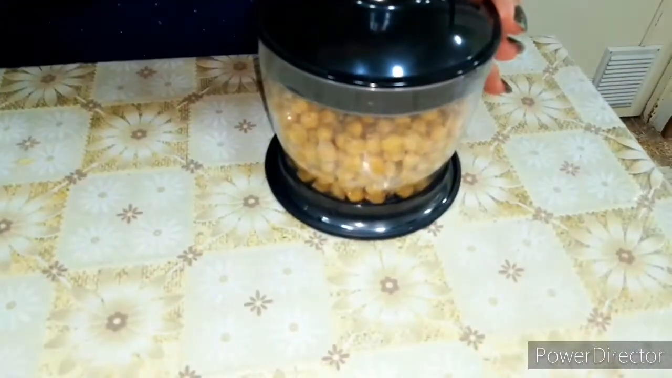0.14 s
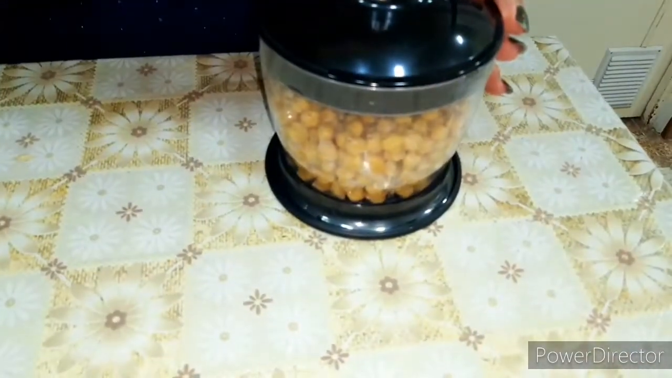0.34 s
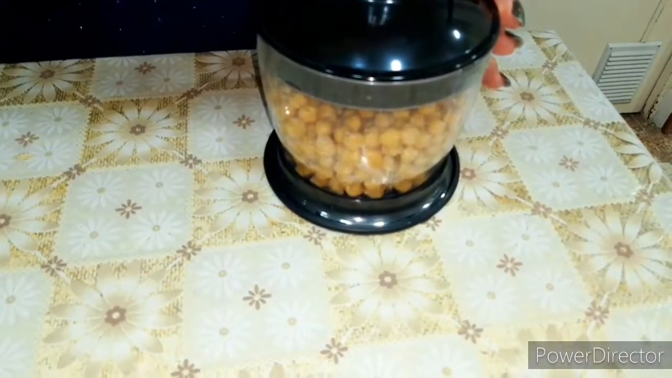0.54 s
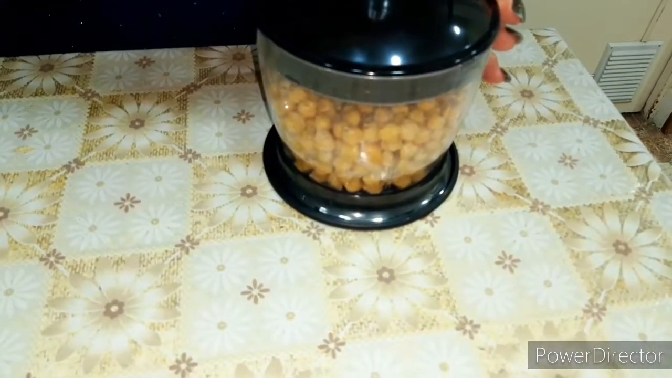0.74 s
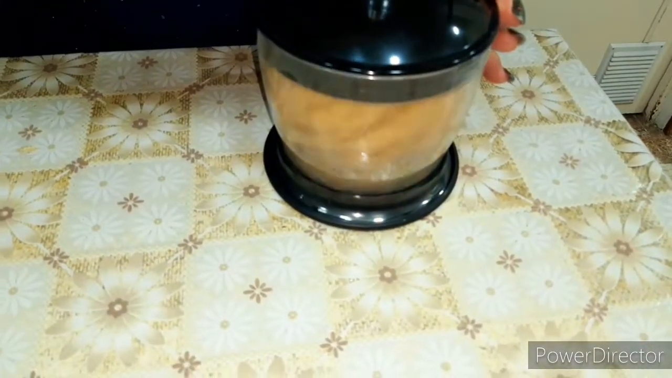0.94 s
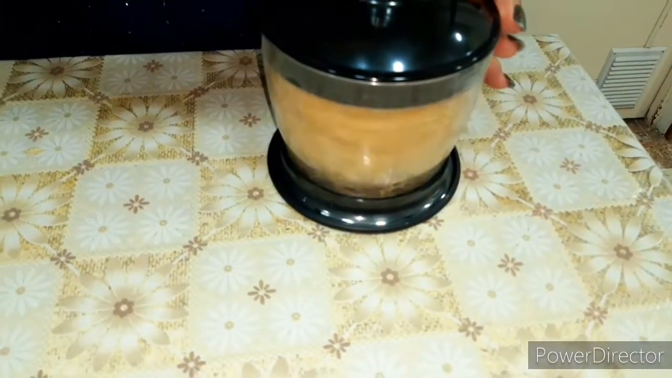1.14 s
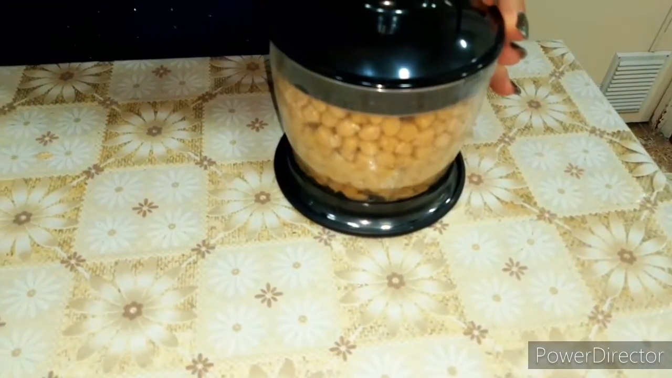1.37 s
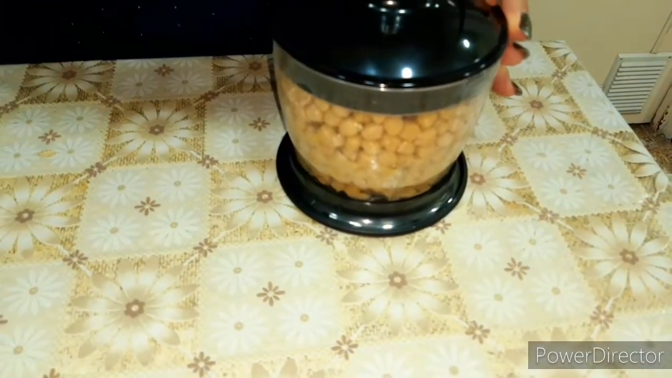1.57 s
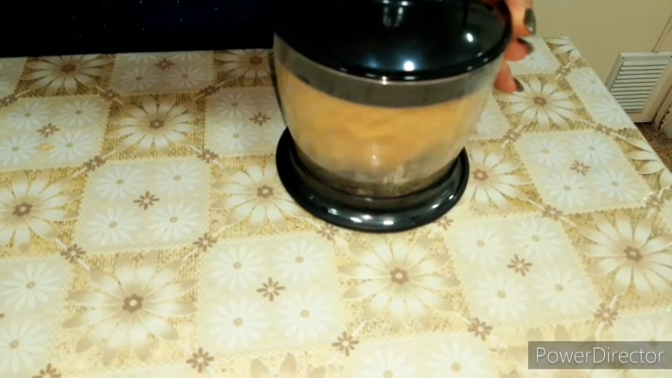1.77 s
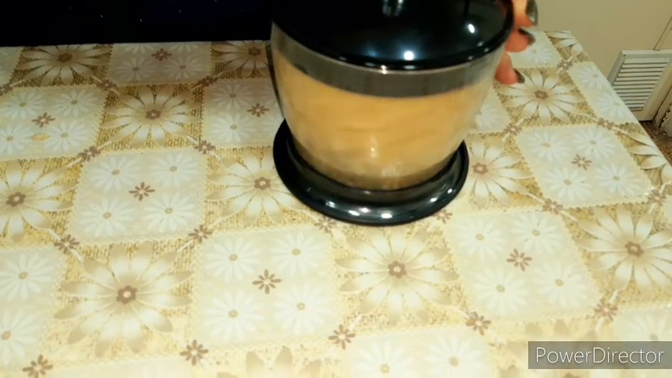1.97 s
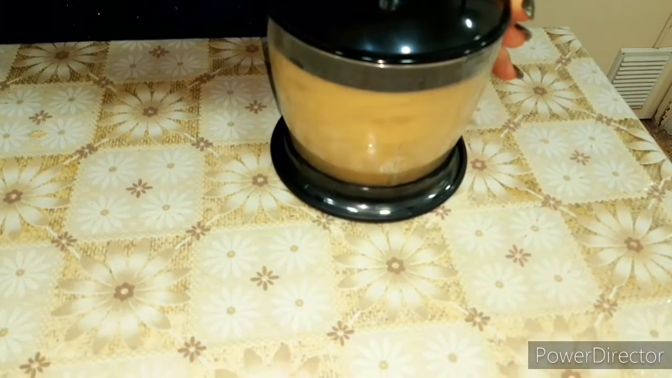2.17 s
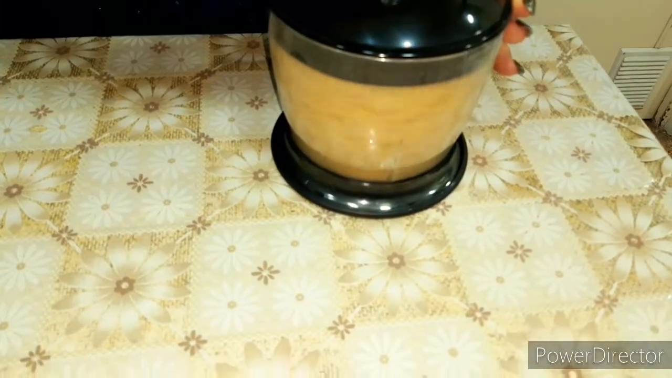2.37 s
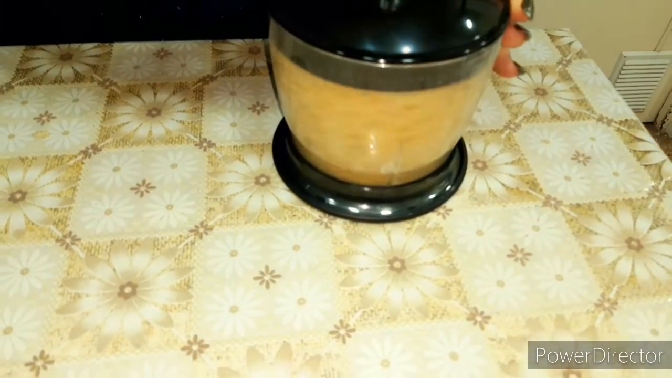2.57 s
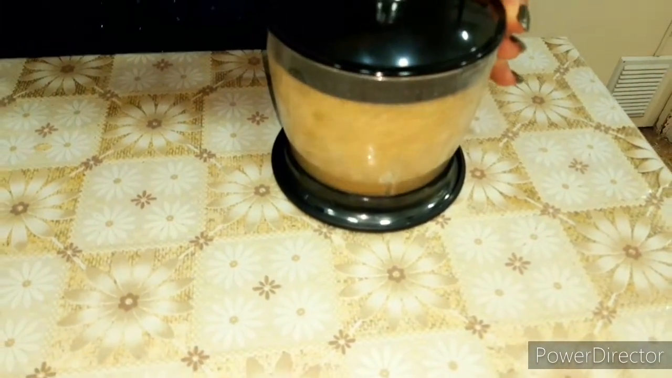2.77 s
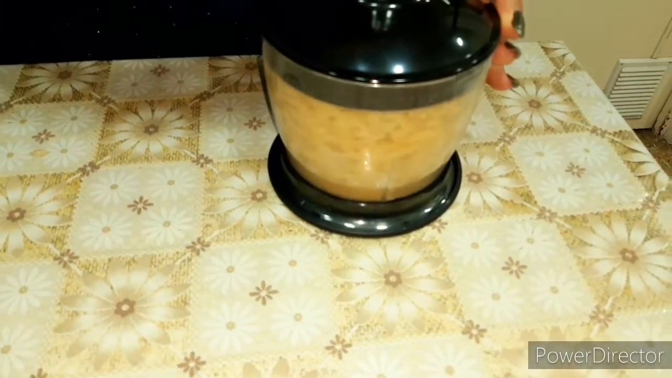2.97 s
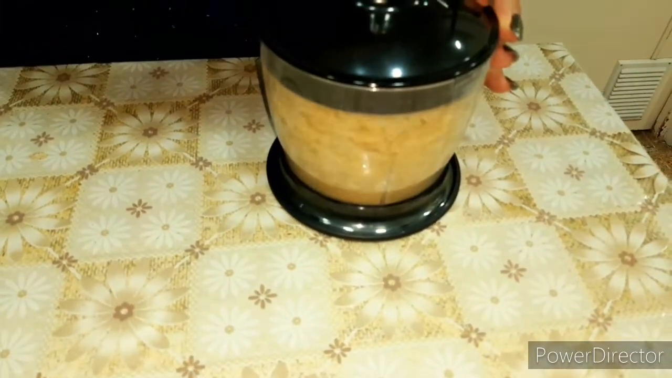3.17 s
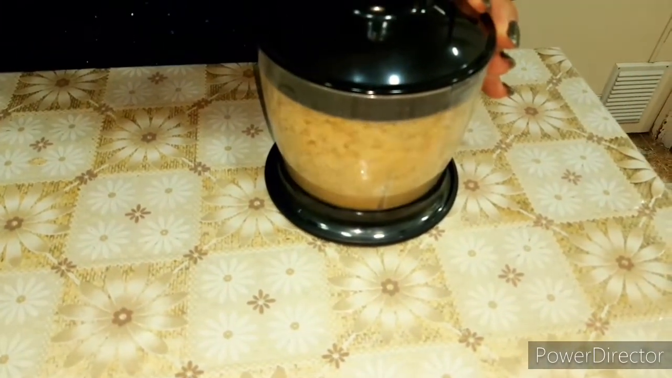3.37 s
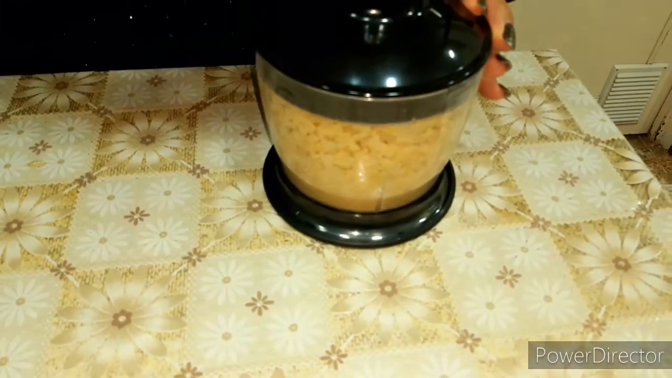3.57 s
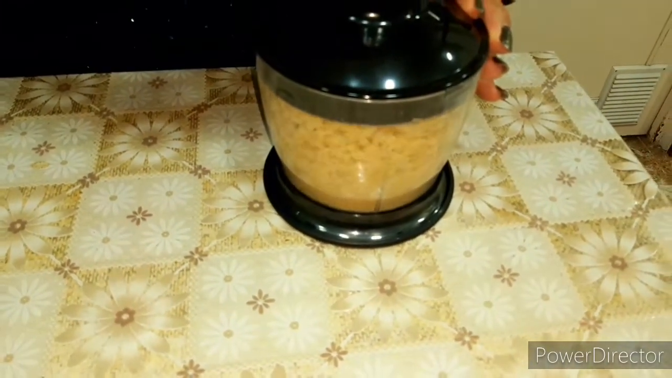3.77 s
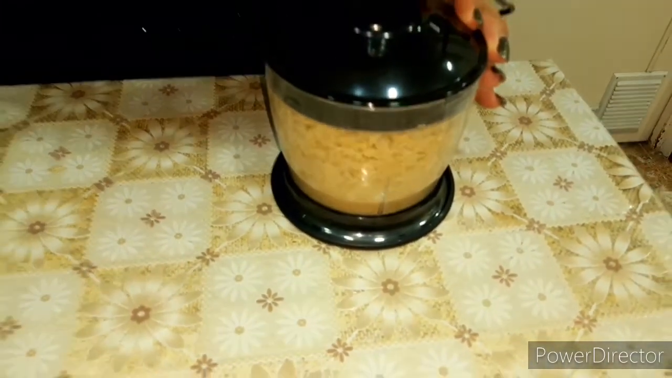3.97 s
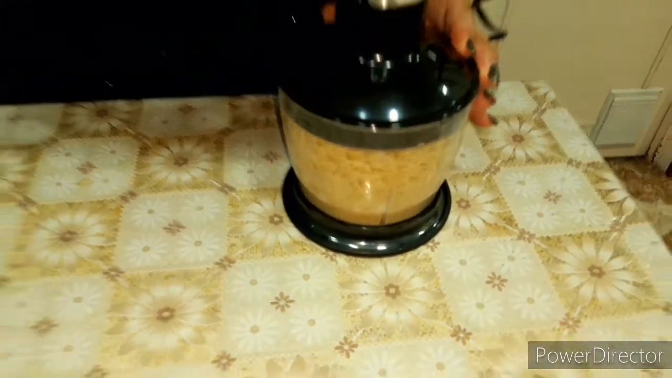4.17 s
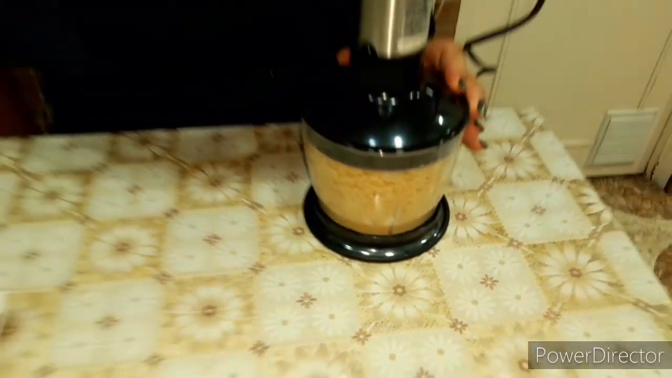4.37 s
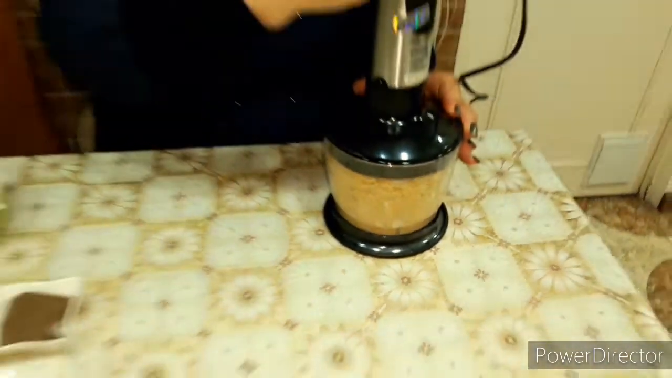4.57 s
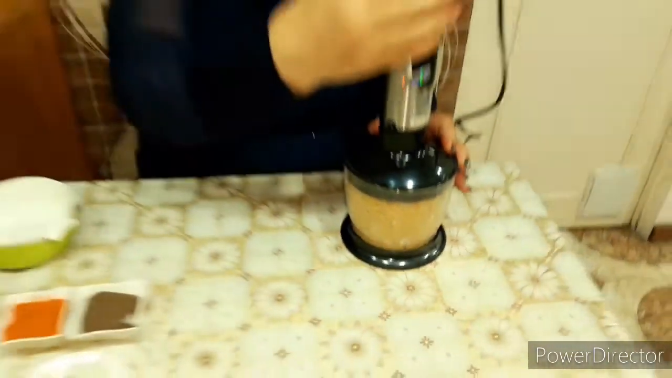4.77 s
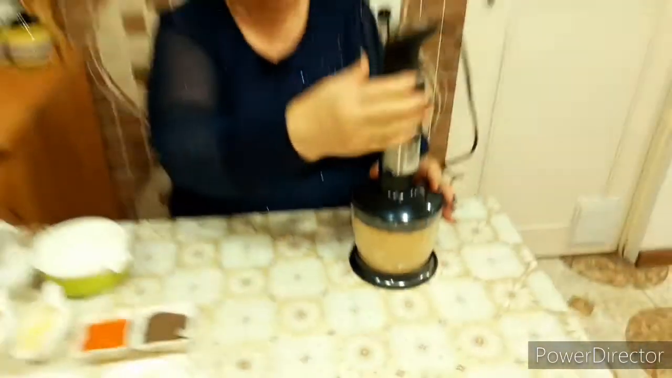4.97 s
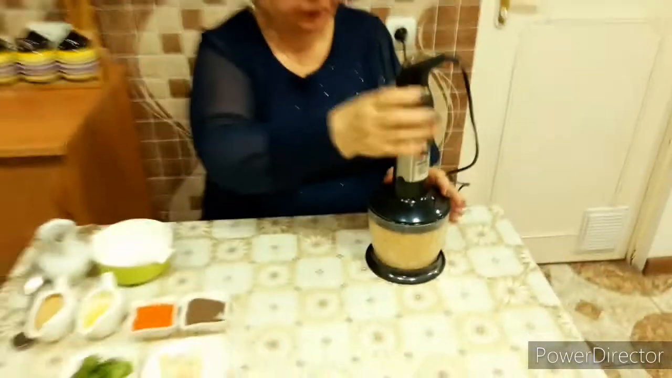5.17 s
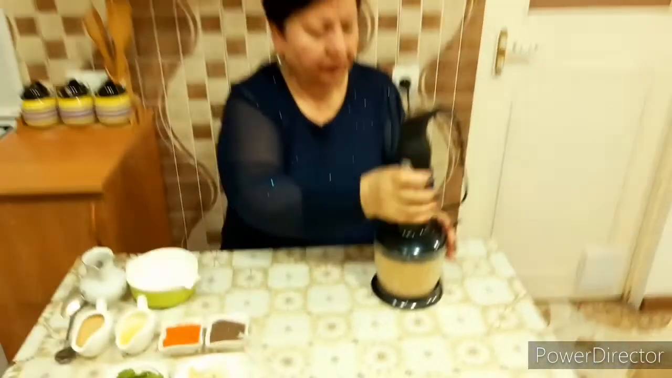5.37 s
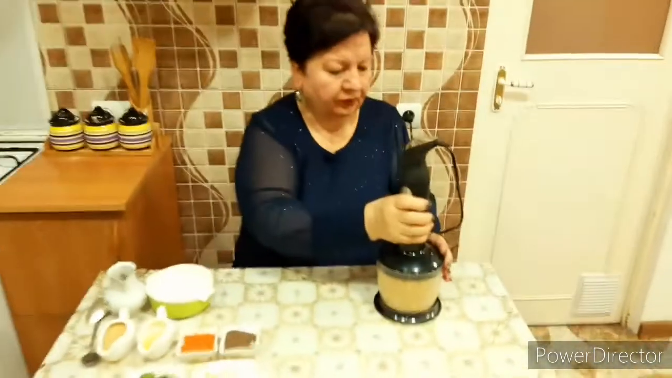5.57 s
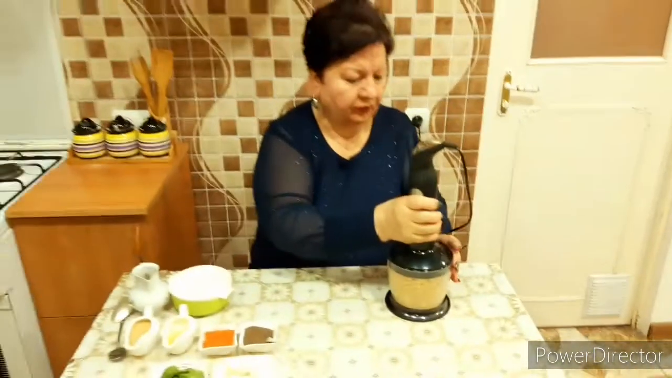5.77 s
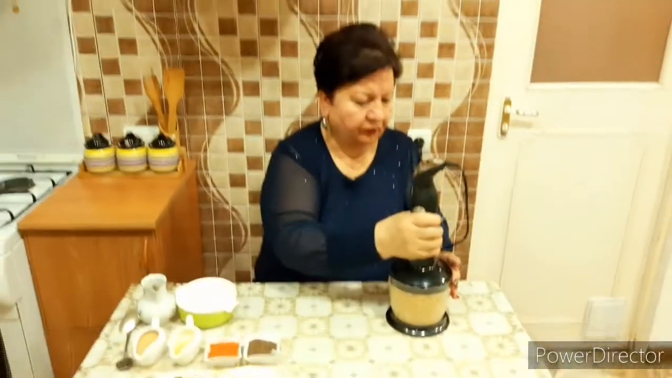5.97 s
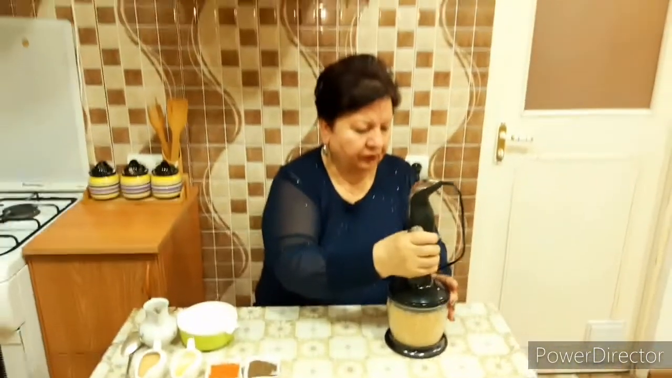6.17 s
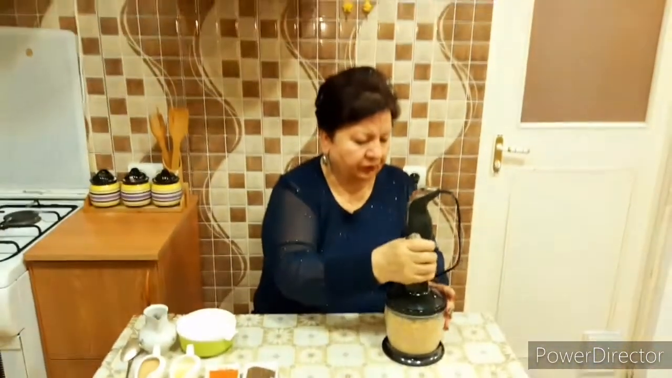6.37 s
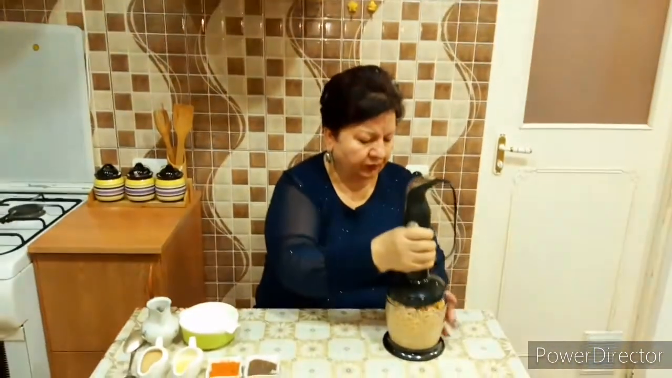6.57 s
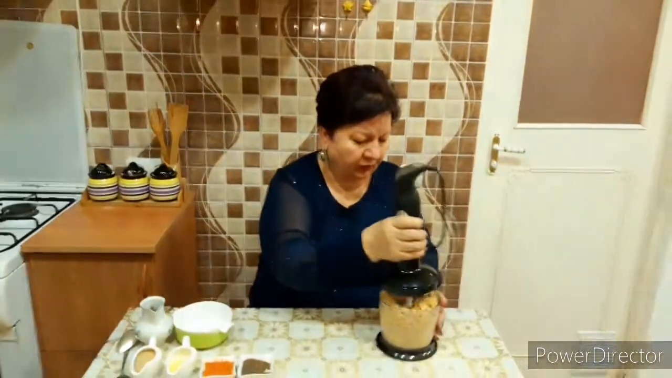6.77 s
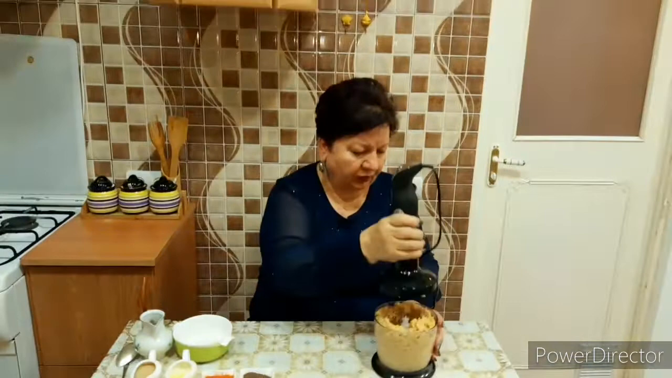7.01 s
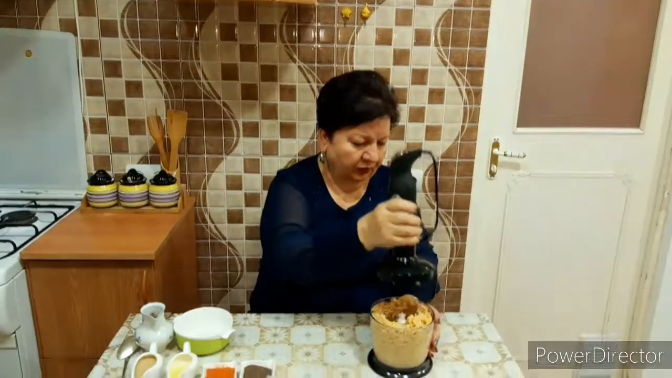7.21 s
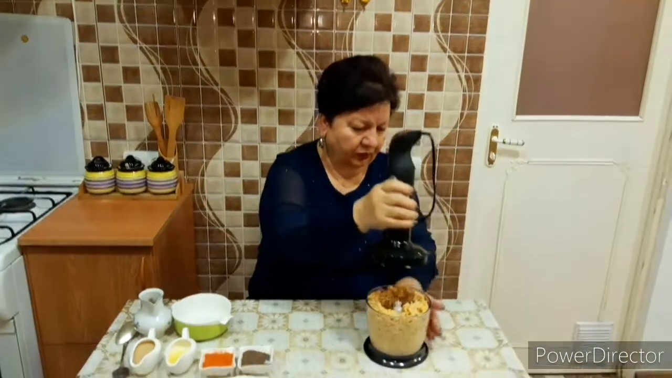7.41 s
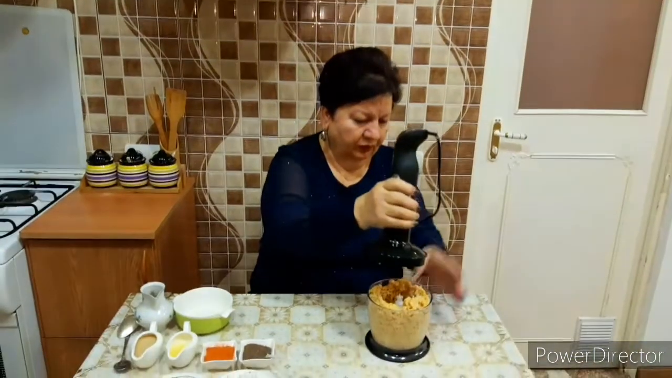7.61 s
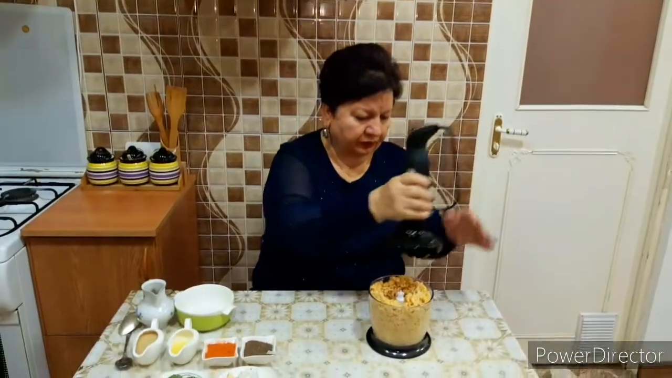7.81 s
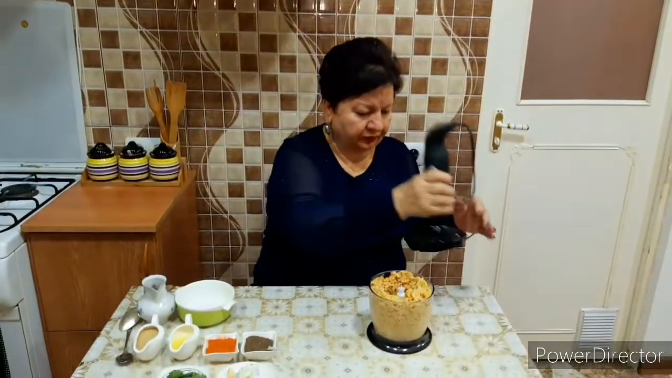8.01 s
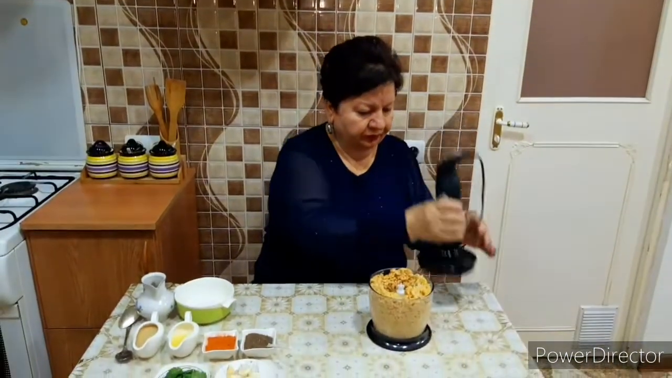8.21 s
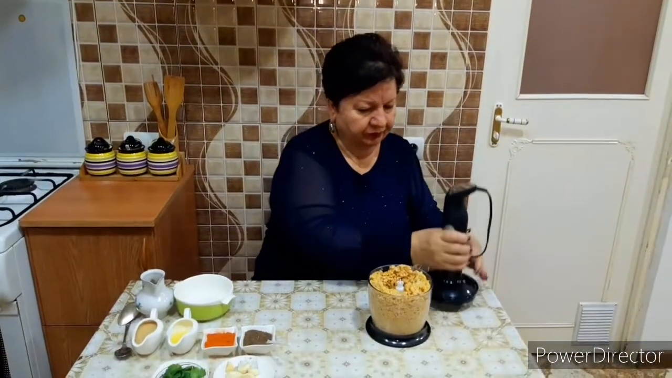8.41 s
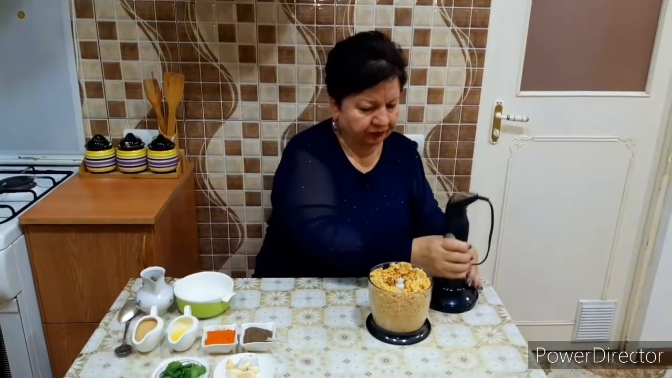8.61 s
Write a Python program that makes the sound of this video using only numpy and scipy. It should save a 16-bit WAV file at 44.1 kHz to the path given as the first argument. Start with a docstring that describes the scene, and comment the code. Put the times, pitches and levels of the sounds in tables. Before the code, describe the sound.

Close to the microphone in an echoing tiled kitchen, an electric chopper jerks on for a brief clattering pulse through whole chickpeas and coasts down. It then runs for over two seconds, whining and rattling while hard knocks soften into a dense paste churn. After it winds down, the lid, heard from further back, clicks, groans, pops and slides off over quiet room hum.

```python
"""A tiled kitchen: a hand blender drives a chopper bowl of boiled chickpeas, one short pulse, then a longer run.
Shaped noise and tiny impacts make the blade's battering; single ticks are whole peas on the wall.
Pulsing noise makes the gears rattle, sine tones make the motor whine; both slow as the paste thickens.
Clicks, rubbing and slides work the lid loose and lift it off, over room noise and an appliance's hum."""
import sys
import numpy as np
from scipy import signal
from scipy.fft import rfft, irfft, next_fast_len
from scipy.io import wavfile

SR = 44100
rng = np.random.default_rng(int(sys.argv[2]) if len(sys.argv) > 2 else 0)


def to_wav(sig):
    """Store sig (one row per channel, or 1-D mono) as 16-bit WAV at the path in sys.argv[1].

    Samples outside -1..1 are clipped; the rate is SR.
    """
    pcm = np.clip(np.atleast_2d(sig), -1, 1) * 32767
    pcm = np.round(pcm).astype(np.int16)
    wavfile.write(sys.argv[1], SR, pcm.T)  # frames by channels


N = 381465
TIME = np.arange(N) / SR

# the button is held: (on [s], off [s], coasting time constant [s], relative whine level [dB])
RUNS = [(0.902, 1.112, .172, -0.5), (1.721, 4.333, .268, 1.5)]
# colour of the plastic lid, also lent to the coupling: (pitch [Hz], relative level [dB per Hz])
LID_COLOUR = [(200, 2), (400, 4), (600, 4), (1000, 5.5), (1500, 2), (2100, 3.5), (2800, -9.5),
              (5000, -16.5), (7500, -33.5), (9000, -43.5), (14000, -50.5)]
# loudness of the battered peas, as explained in loudness():
# (level in whole peas [dB], change once paste [dB], power of the speed, share of a bite)
CHOP_LOUDNESS = (-18, -5.5, 1.5, 1.0)
PASTE_FROM_S, PASTE_DONE_S = 1.8, 4.25   # the peas turn to paste


def from_db(db):
    """Turn decibels into a gain."""
    return 10 ** (np.asarray(db) / 20)


def rms_one(x):
    """Scale a sound to an average strength (rms) of 1."""
    return x / np.sqrt(np.mean(x ** 2) + 1e-20)


def in_time(rows):
    """Draw a curve through (time, value) points, one value for every sample."""
    return np.interp(TIME, *np.transpose(rows))


def at_hz(points, hz):
    """Read a (pitch, value) curve, with pitch on a logarithmic scale as the ear hears it."""
    points = np.array(points)
    return np.interp(np.log(hz), np.log(points[:, 0]), points[:, 1])


def drift(rate):
    """Wander at random around 0 with a spread of about 1, towards `rate` new targets a second."""
    targets = rng.standard_normal(N // 20)
    return np.interp(TIME * rate, np.arange(len(targets)), targets) * np.sqrt(1.5)


def colour(x, points):
    """Filter with a given spectrum that never sounds ahead of its input; white noise keeps its power."""
    size = 8192
    hz = np.maximum(np.arange(size // 2 + 1) * SR / size, 1)
    gain = rms_one(from_db(at_hz(points, hz)))
    # folding the cepstrum forward packs the response as early as possible (minimum phase)
    cepstrum = irfft(np.log(gain))
    cepstrum[1:size // 2] *= 2
    cepstrum[size // 2 + 1:] = 0
    response = irfft(np.exp(rfft(cepstrum)))[:size // 2]
    response = response.reshape((1,) * (x.ndim - 1) + (-1,))
    return signal.oaconvolve(x, response, axes=-1)[..., :N]


def resonance(x, hz, width):
    """Ring at one pitch: a two-pole band-pass with gain 1 on top; a narrow width [Hz] rings longer."""
    r = np.exp(-np.pi * width / SR)
    poles = [1, -2 * r * np.cos(2 * np.pi * hz / SR), r * r]
    return signal.lfilter([1, 0, -1], poles, x + 1e-18) * (1 - r * r) / 2


def rings(x, modes):
    """Add up resonances (pitch, width, level); at 0 dB each keeps the power of white noise."""
    return sum(from_db(db) * np.sqrt(SR / np.pi / width) * resonance(x, hz, width)
               for hz, width, db in modes)


def grains(per_s, spread_db):
    """Scatter tiny impacts of uneven size at random moments; rms 1."""
    sizes = from_db(spread_db * np.minimum(rng.exponential(1, N), 4))
    sizes = sizes * rng.choice([-1, 1], N)
    return rms_one(sizes * (rng.random(N) < per_s / SR))


def blows(rows):
    """Place one single-sample impulse for each (time, level) row."""
    out = np.zeros(N)
    for s, db in rows:
        out[round(s * SR)] += from_db(db)
    return out


def swell(s, length):
    """A smooth bump of height 1 around a moment; length is its width at half height."""
    return np.exp2(-np.minimum((2 * (TIME - s) / length) ** 2, 60))


def strokes(rows):
    """Gain of hand movements (middle, length, level) that each swell and fade."""
    return sum(from_db(db) * swell(s, length) for s, length, db in rows)


def dying(s, decay_s):
    """A sudden rise to 1, then an exponential fall."""
    return np.exp(-np.minimum(np.abs(TIME - s) / decay_s, 30)) * (TIME >= s)


def read(x, seconds):
    """Play a sound along another clock, so that its pitch follows the clock's pace."""
    return np.interp(seconds, TIME, x)


def each_turn(turns, count=900):
    """A fixed random roughness that the blade and gears meet again on every turn; rms 1."""
    return rms_one(np.interp(turns % 1 * count, np.arange(count), rng.standard_normal(count)))


def background(width=.3, hiss_db=-81):
    """Dull room noise, a hum of steady mains tones that waver a little, and faint hiss."""
    # level of room noise and hum together: (time [s], level [dB])
    ambience = [(.15, -57), (1.6, -63), (4.9, -63.5), (5.5, -61), (6.1, -55.5), (8.65, -54)]
    # colour of the room noise: (pitch [Hz], relative level [dB per Hz])
    room_colour = [(25, -44.5), (50, -16), (70, -15), (92, -7.5), (130, -4.5), (180, -8), (250, -10),
                   (305, -5.5), (350, -7.5), (420, -6.5), (580, -17.5), (800, -16.5), (1000, -26.5),
                   (1400, -30.5), (2500, -44.5), (4500, -64.5), (15000, -51)]
    # tones of the hum: (pitch [Hz], relative level [dB])
    hum_tones = [(100, -4.5), (200, -16), (300, -4), (400, -12.5)]
    # the hum fades briefly: (middle [s], length [s], loss [dB])
    hum_dip = (1.55, .5, 10)
    hum_db = 0.5   # against the room noise

    mid, side = colour(rng.standard_normal((2, N)), room_colour)
    rumble_cut = signal.butter(2, 55, "high", fs=SR, output="sos")
    air = signal.sosfilt(rumble_cut, mid + width * side * [[1], [-1]])
    hum = np.zeros(N)
    for hz, db in hum_tones:
        strength = np.sqrt(2) * from_db(db + 1.1 * drift(6.6))
        hum += strength * np.sin(2 * np.pi * hz * TIME + 0.292 * drift(9.8))
    s, length, lost_db = hum_dip
    hum = from_db(hum_db - lost_db * swell(s, length)) * hum
    hiss = from_db(hiss_db) * rng.standard_normal((2, N))
    return from_db(in_time(ambience)) * (air + hum) + hiss


def lid(click_db=-1.0, pop_db=-52, rub_db=-6.0, slide_db=-8, shell_db=-3, shift_s=.004):
    """The lid clicks, groans in its seat, pops free of the hollow bowl and slides off the sticky paste."""
    # plastic clicks: (time [s], relative body level [dB], relative latch level [dB])
    clicks = [(0.046, -42, -64), (0.129, -39, -58), (5.603, -35, -36.5), (5.628, -60, -41),
              (5.66, -63, -45), (5.708, -32.5, -52), (5.872, -25, -46), (5.877, -21.5, -50),
              (6.275, -52, -63), (6.593, -50, -42), (7.517, -45, -56)]
    # colours of latch, pop, rubbing and sliding: (pitch [Hz], relative level [dB per Hz])
    latch_colour = [(400, -6.5), (800, -3), (1500, -10), (2500, 0), (3600, 2), (4700, -1), (5600, -9),
                    (7200, -6), (8500, -27), (14000, -13)]
    pop_colour = [(350, -8), (590, 1), (850, -25), (1350, -7), (1600, -19), (2000, -9), (2500, -14),
                  (3000, -8.5), (3600, -19), (4400, -32), (6400, -19), (9000, -44)]
    rub_colour = [(90, -19), (160, 3.5), (230, 2), (300, 3), (400, -14), (900, -22), (2000, -62)]
    slide_colour = [(500, -11), (1200, -3.5), (1800, -6), (2300, -2), (2700, -7), (3200, -10),
                    (5000, -14.5), (7000, -9.5), (8500, -23.5), (12000, -17.5), (15500, -24)]
    # rings of the lid, its latch and its thin shell: (pitch [Hz], width [Hz], relative level [dB])
    lid_modes = [(340, 25, -7), (560, 45, -8), (840, 70, -9.5), (1120, 60, -9), (1444, 90, -11),
                 (2030, 170, -6)]
    latch_modes = [(790, 110, -4), (1480, 200, -7), (3550, 280, -3), (4350, 450, -7)]
    shell_modes = [(2160, 140, -0.5), (2600, 160, -8.5), (3420, 180, -11.5)]
    # the lid is twisted in its seat: (middle [s], length [s], relative level [dB])
    rubs = [(5.805, 0.047, -38.5), (5.905, 0.062, -35), (6.07, 0.072, -40), (6.17, 0.09, -39),
            (6.29, .05, -46)]
    # hands and sticky paste slide on plastic: (middle [s], length [s], relative level [dB])
    slides = [(.1, 0.21, -71.5), (.63, 0.13, -69), (5.33, 0.5, -69.5), (5.72, 0.27, -70),
              (6.15, 0.6, -65.5), (6.83, 0.13, -69), (6.98, .13, -63.5), (7.14, 0.23, -63),
              (7.5, 0.32, -72), (8.45, 0.46, -74)]
    pop_s, pop_decay_s = 6.592, .03

    on_body = blows([(s, body) for s, body, latch in clicks])
    on_latch = blows([(s, latch) for s, body, latch in clicks])
    knocks = from_db(click_db) * (colour(on_body, LID_COLOUR) + colour(on_latch, latch_colour))
    knocks = knocks + rings(on_body, lid_modes) + rings(on_latch, latch_modes)

    hollow = colour(dying(pop_s, pop_decay_s) * rng.standard_normal(N), pop_colour)
    # the air in the open bowl booms briefly
    pop = from_db(pop_db) * (hollow + resonance(hollow, 580, 59.6))

    rub = strokes(rubs) * from_db(rub_db) * colour(grains(550, spread_db=2.0), rub_colour)

    slips = grains(900, spread_db=3)
    # the shell's ring moves with the point of contact
    shell = read(rings(slips, shell_modes), TIME + shift_s * drift(8))
    scrape = colour(slips, slide_colour) + from_db(shell_db) * shell
    slide = strokes(slides) * from_db(slide_db + drift(20)) * scrape
    return knocks + pop + rub + slide


def kitchen():
    """Echoes of the tiled room, in stereo: a smooth tail of noise that dies away band by band."""
    # time to fall by 60 dB: (pitch [Hz], time [s])
    fall_times = [(100, 0.28), (600, 0.6), (2000, 0.58), (3600, 0.58), (6000, 0.34), (14000, 0.18)]
    # strength of the echoes: (pitch [Hz], level against the direct sound [dB])
    wet_levels = [(100, -22), (300, -11), (1000, -2), (4000, -6.5), (14000, -4)]
    t = TIME[:SR // 2]
    edges = np.geomspace(60, 16000, 13)
    tail = np.zeros((2, len(t)))
    for low, high in zip(edges, edges[1:]):
        hz = np.sqrt(low * high)
        band_pass = signal.butter(2, [low, high], "band", fs=SR, output="sos")
        band = signal.sosfilt(band_pass, rng.standard_normal((2, len(t))))
        apart = 1 / (1 + (300 / hz) ** 2)   # long waves reach left and right alike
        band = np.sqrt(apart) * band + np.sqrt((1 - apart) / 2) * band.sum(axis=0)
        decay = from_db(-60 * t / at_hz(fall_times, hz))
        decay = decay * np.clip((t - .002) / 0.00086, 0, 1)   # the echoes start after 2 ms
        tail += band * decay / np.linalg.norm(decay) * from_db(at_hz(wet_levels, hz))
    return tail


def spin(on, off, coast_s):
    """Share of working speed in one run: a jerk, a quick rise, then coasting to rest against friction."""
    kick, spin_up_s = .42, .045   # share of speed gained at the first jerk; time constant of the rise
    dry_friction, paste_drag = .1, .18   # end the coasting; thick paste adds its drag
    since_on, since_off = np.maximum(TIME - on, 0), np.maximum(TIME - off, 0)
    rise = (TIME >= on) * (1 - (1 - kick) * np.exp(-since_on / spin_up_s))
    friction = dry_friction + paste_drag * (off > PASTE_FROM_S)
    coast = (1 + friction) * np.exp(-since_off / coast_s) - friction
    return np.clip(rise, 0, 1) * np.clip(coast, 0, 1)


def loudness(law, drive, paste):
    """Gain of one part of the blender: it follows the speed, the state of the paste and the bites."""
    # the blade bites into a heap of peas: (middle [s], length [s], level before each part's share [dB])
    bites = [(0.938, 0.071, 6), (1.06, 0.056, 0.5), (1.776, 0.024, 6), (1.93, 0.072, 1.5),
             (2.093, 0.049, 2), (2.22, 0.026, 1.5), (2.66, 0.099, 1), (3.36, 0.12, 0.4)]
    paste_bend = 2   # levels change slowly at first, then faster
    peas_db, paste_db, power, bite_share = law
    bites_db = sum(db * swell(s, length) for s, length, db in bites)
    level_db = peas_db + paste_db * paste ** paste_bend + bite_share * bites_db
    return from_db(level_db) * drive ** power


def tones(turns, orders, flutter_db=2):
    """Sine tones at multiples of the blade rate, each wavering in level, until the blade stops for good."""
    out, on = np.zeros(N), slice(0, np.argmax(turns))
    for multiple, db in orders:
        strength = from_db(db + flutter_db * drift(30)[on])
        out[on] += strength * np.sin(2 * np.pi * (multiple * turns[on] + rng.random()))
    return out


def coupling(clack_db=-4):
    """The shaft takes up its play and knocks against its plastic socket as the motor starts."""
    return colour(blows([(on + .002, clack_db) for on, off, coast_s, db in RUNS]), LID_COLOUR)


def whine(turns, drive, paste, rasp_db=-8.5, rasp_width=280, swoop_db=-32):
    """Twelve armature slots a motor turn whine, with side tones and rasp; a cry swoops down at each power cut."""
    # tones of the motor: (multiple of the blade rate, relative level [dB])
    motor_orders = [(66, -25.5), (69, -12), (71, -21), (72, -8), (73, -16), (75, -18.5), (78, -25),
                    (108, -21.5)]
    # tone of the coasting motor: (multiple of the blade rate, relative level [dB])
    swoop_orders = [(108, 0)]
    # (level in whole peas [dB], change once paste [dB], power of the speed, share of a bite)
    whine_loudness = (-20.5, -2.5, 6.5, 1.55)
    swoop_s, waver_db = .075, 1.5   # length of the cry; the voice wavers under loose peas

    # random wobble spreads the main tone into a rough skirt of neighbouring pitches
    wobble = drift(2 * rasp_width) + 1j * drift(2 * rasp_width + 20)
    rasp = np.real(wobble * np.exp(2j * np.pi * 72 * turns))
    cut, strength = np.zeros(N), np.zeros(N)
    for on, off, coast_s, db in RUNS:
        cut += from_db(db) * swell(off + swoop_s / 2, swoop_s)
        strength += from_db(db) * (spin(on, off, coast_s) > 0)
    strength = strength * from_db(waver_db * (1 - paste) * drift(25))
    voice = tones(turns, motor_orders) + from_db(rasp_db) * rasp
    singing = strength * loudness(whine_loudness, drive, paste) * voice
    cry = drift(250) * tones(turns, swoop_orders, flutter_db=1.0)
    return singing + from_db(swoop_db) * cut * cry


def gears(turns, drive, paste, rattle_db=-5.5, throb=.45, bite=0.33, repeat=0.5, loose=0.43):
    """Noise pulses at 36 tooth contacts and 6 motor turns a blade turn; gear tones grow as paste forms."""
    # colour of the gearbox: (pitch [Hz], relative level [dB per Hz])
    gearbox_colour = [(900, -32), (1350, -11), (1600, -3.5), (1850, -1), (2080, -3.5), (2400, -14),
                      (2900, -25.5), (3500, -8), (4100, -17), (7000, -38.5)]
    # tones of the gear train: (multiple of the blade rate, relative level [dB])
    gear_orders = [(33, -10), (36, -11), (38, -8.5), (39, -17), (42, -15.5)]
    # (level in whole peas [dB], change once paste [dB], power of the speed, share of a bite)
    gear_loudness = (-22.5, 0.66, 2, 0.82)
    # the gear housing rings at a fixed pitch: (pitch [Hz], width [Hz], relative level [dB])
    housing_mode = (2050, 600, -2.5)
    even_rate = 49.5   # blade turns per second at which the rattle is first made

    even = even_rate * TIME
    motor, mesh = np.cos(2 * np.pi * 6 * even), np.cos(2 * np.pi * 36 * even)
    contacts = rng.standard_normal(N) + .5 * rng.standard_normal((2, N)) + repeat * each_turn(even)
    rattle = colour(rms_one(contacts * np.exp(throb * motor + bite * mesh)), gearbox_colour)
    # replayed at the blade's own pace, the rattle sinks in pitch with the speed
    rattle = np.array([read(side, turns / even_rate) for side in rattle])
    hz, width, db = housing_mode
    housing = rms_one(resonance(resonance(contacts, hz, width), hz, width))
    rattle = rattle + from_db(db) * housing
    steady = loose + (1 - loose) * paste   # a steady load makes the teeth sing
    singing = steady * tones(turns, gear_orders)
    return loudness(gear_loudness, drive, paste) * (from_db(rattle_db) * rattle + singing)


def chopping(turns, drive, paste, chop_db=1.3, spray_db=1, pea_db=2, heave_db=-8,
             beat=0.28, repeat=0.15, churn_db=0.5):
    """Two blade wings batter the peas and fling bits at the wall; hits get finer and more regular in paste."""
    # colours of bowl, whole peas and paste spray: (pitch [Hz], relative level [dB per Hz])
    bowl_colour = [(35, -62), (60, -26), (75, -30), (129, -11.5), (177, -10), (210, -4), (280, -2),
                   (320, -2.5), (422, -3), (579, -1), (669, -3), (894, -4.5), (1010, -5.5), (1160, -14),
                   (1400, -12), (1820, -47.5), (3080, -120)]
    pea_colour = [(700, -12.5), (1100, -10), (1400, -3.5), (2200, -3.5), (2650, 1.5), (3000, -10),
                  (4600, -12), (5300, -22), (6100, -8.5), (7000, -30.5)]
    spray_colour = [(900, -20.5), (1400, 4), (2600, 0), (3000, 1.5), (4100, -0.5), (4600, 0.5), (5600, -3),
                    (6200, -4), (6800, -6), (7600, -3.5), (8400, -15), (11000, -11), (13500, -13),
                    (15500, -30.5)]
    # hollow ring of bowl and table top: (pitch [Hz], width [Hz], relative level [dB])
    bowl_modes = [(129.2, 44, 4), (207.5, 20, 6.5), (322.4, 25, 6.5), (364, 14, 2.5), (600, 100, -6.5),
                  (1060, 170, -1)]
    # a bowl lined with paste honks: (pitch [Hz], width [Hz], relative level [dB])
    paste_mode = (590, 170, -10)
    # (level in whole peas [dB], change once paste [dB], power of the speed, share of a bite)
    spray_loudness = (-26, -1.7, 1.5, 1.25)
    # lumps of peas thump against the bowl: (time [s], level added to the thud [dB])
    lumps = [(.934, 3.5), (.983, 3.5), (1.129, 2.5), (1.903, 1.5), (2.116, 2.5), (2.234, 4.5), (2.263, 4),
             (2.335, 3.5), (2.585, 2), (2.628, 3.5), (2.857, 2), (2.937, 2), (3.037, 3.5), (3.325, 3.5)]
    lump_s, soft_hz, soft_power = .022, 7000, 1.3

    passing = np.exp(beat * np.cos(4 * np.pi * turns + 0.68 * drift(20)))   # two wings a turn
    per_s = (500 + 1500 * paste) * (drive + .5)
    hits = rms_one(grains(per_s, spread_db=2.5) / np.sqrt(per_s) * passing)
    # each side of the bowl spatters on its own
    spatter = rms_one(rng.standard_normal((2, N)) * passing)

    thud = colour(hits + 0.38 * spatter + repeat * paste * each_turn(turns), bowl_colour)
    centre = thud.mean(axis=0)
    hz, width, db = paste_mode
    honk = paste * from_db(db) * resonance(centre, hz, width)
    ring = sum(from_db(db) * resonance(centre, hz, width) for hz, width, db in bowl_modes)
    thud = rms_one(1.2 * thud + honk + ring)
    # whole peas heave the bowl and knock hard on its wall
    knock = rms_one(resonance(resonance(hits, 175, 150), 175, 150))
    heave = from_db(heave_db) * (1 - paste) ** 3 * knock

    spray = colour(0.5 * hits + 1.317 * spatter, spray_colour)
    spray = spray + from_db(pea_db) * (1 - paste) * colour(hits, pea_colour)
    # as the blade slows, loose peas drop away from the wall faster than paste
    spray = spray * drive ** (1 - paste)
    # slower bits land more softly: above soft_hz the treble falls by an extra power of the speed
    dull = signal.lfilter(*signal.butter(1, soft_hz, fs=SR), spray)
    spray = dull + drive ** soft_power * (spray - dull)

    lumps_db = sum(db * swell(s, lump_s) for s, db in lumps)
    churn = from_db(lumps_db + churn_db * drift(30))   # the load tumbles unevenly
    battering = churn * loudness(CHOP_LOUDNESS, drive, paste) * (from_db(chop_db) * thud + heave)
    return battering + from_db(spray_db) * loudness(spray_loudness, drive, paste) * spray


def table(turns, drive, paste, shake_db=-38):
    """The unbalanced bowl shakes the table once a turn and jolts it when the load changes."""
    # the bowl jolts on the table: (time [s], peak level [dB])
    jolts = [(0.925, -21), (1.994, -20.5), (4.43, -41.5)]
    thump = resonance(resonance(blows(jolts), 84, 45), 84, 100)
    thump = thump / np.abs(thump).max() * from_db(max(db for s, db in jolts))
    shake = np.sin(2 * np.pi * turns) + 0.2 * rms_one(resonance(drift(200), 55, 30))
    return thump + from_db(shake_db) * loudness(CHOP_LOUDNESS, drive, paste) * shake


def cracks(crack_db=-5):
    """Single hard peas hit the plastic wall, each an impulse filtered to a bright tick."""
    # (time [s], relative level [dB])
    pea_hits = [(.929, -1.5), (.957, 0), (1.002, 3), (1.01, 5), (1.029, -1), (1.056, -1), (1.081, -2.5),
                (1.876, -3), (1.888, -1), (1.998, -1.5), (2.084, -2.5), (2.112, -2), (2.227, -3),
                (2.964, -2), (3.035, -3.5), (3.286, -3), (3.339, 0.5)]
    # (pitch [Hz], relative level [dB per Hz])
    crack_colour = [(800, -14), (2500, -1.5), (6000, 2), (8500, -7), (12000, -3), (15500, -16.5)]
    return from_db(crack_db) * colour(blows(pea_hits), crack_colour)


def scene(far_db=8, sway=1.5):
    """Speed and thickening paste shape the blender's sound; lid, echoes and background join it."""
    # working speed of the blade, sinking as the paste thickens: (time [s], speed [turns per s])
    working_speed = [(1.0, 51), (1.86, 55), (1.92, 52.3), (2.07, 53.6), (2.13, 51.1), (2.27, 51.8),
                     (2.41, 51), (2.55, 51.5), (2.63, 50.4), (2.8, 50), (2.93, 50.5), (3.07, 49.6),
                     (3.17, 49.6), (3.21, 48.7), (3.28, 49.5), (3.44, 49.6), (3.54, 48.9), (3.62, 49.5),
                     (3.68, 49), (3.74, 49.15), (4.0, 48.95), (4.1, 49.2), (4.16, 48.55), (4.22, 48.85),
                     (4.3, 48.5)]
    # packed peas brake the blade: (middle [s], length [s], share of speed lost)
    snags = [(1.815, .05, .05), (1.965, .07, .1)]
    # the blender leans to one side: (pitch [Hz], left minus right [dB])
    lean = [(200, 0), (500, -2.5), (800, 2), (1200, 1), (2000, 7), (3400, 3.5), (6000, 1.5), (14000, 0.5)]

    paste = np.clip((TIME - PASTE_FROM_S) / (PASTE_DONE_S - PASTE_FROM_S), 0, 1)   # 0 peas, 1 paste
    braking = np.clip(sum(lost * swell(s, length) for s, length, lost in snags), 0, .5)
    drive = sum(spin(on, off, coast_s) for on, off, coast_s, db in RUNS) * (1 - braking)
    speed = drive * in_time(working_speed)
    turns = np.cumsum(speed * (1 + .0015 * drift(30))) / SR   # blade turns so far

    blender = sum(part(turns, drive, paste) for part in (whine, gears, chopping, table))
    blender = blender + coupling() + cracks()
    size = next_fast_len(N + SR // 2)
    hz = np.maximum(np.arange(size // 2 + 1) * SR / size, 1)
    tilt = from_db(at_hz(lean, hz) * np.array([[.5], [-.5]]))
    blender = irfft(rfft(blender, size) * tilt, size)[:, :N]

    handling = lid()
    # the lid is heard from further back, so the room counts for more
    into_room = blender + from_db(far_db) * handling
    here = signal.oaconvolve(into_room, kitchen(), axes=1)[:, :N]
    there = signal.oaconvolve(into_room, kitchen(), axes=1)[:, :N]
    moved = sway * drift(3)   # the sound wanders between two patterns of echoes
    room = np.cos(moved) * here + np.sin(moved) * there
    return blender + room + (handling + background()) * from_db([[-.5], [.5]])


def record(dry):
    """Flatten peaks at full scale, then steeply cut the treble above 15500 Hz."""
    treble_cut = signal.ellip(10, .2, 80, 15500, fs=SR, output="sos")
    return signal.sosfilt(treble_cut, np.clip(dry, -1, 1))


dry = scene()
out = record(dry)
to_wav(out)
```